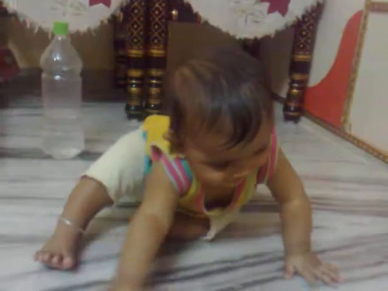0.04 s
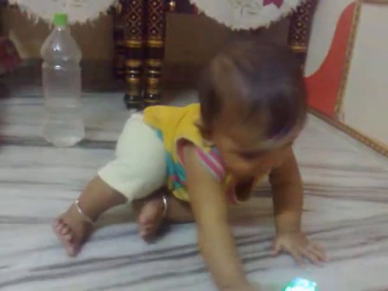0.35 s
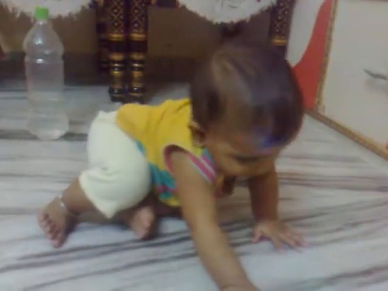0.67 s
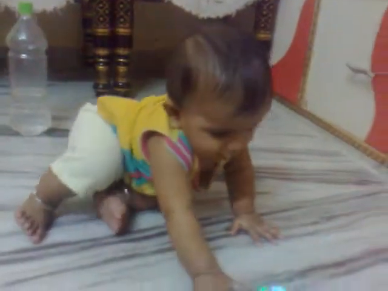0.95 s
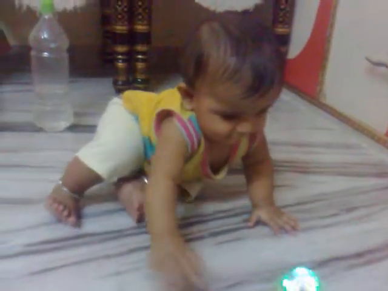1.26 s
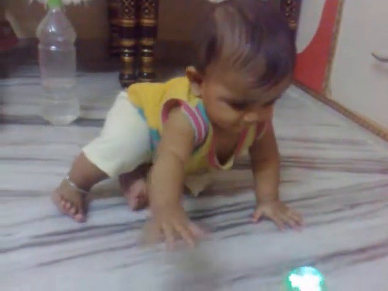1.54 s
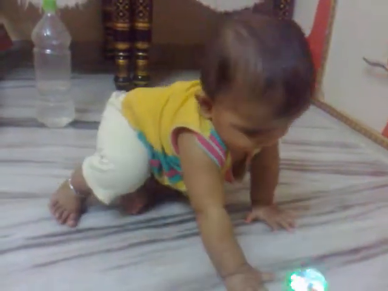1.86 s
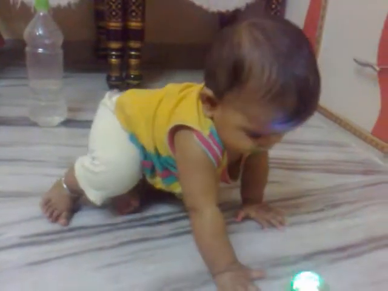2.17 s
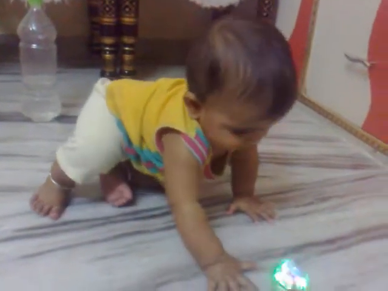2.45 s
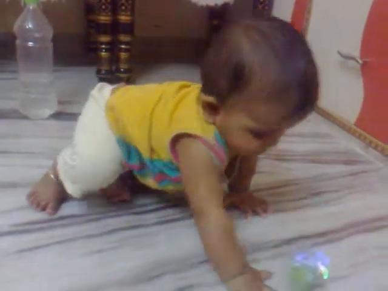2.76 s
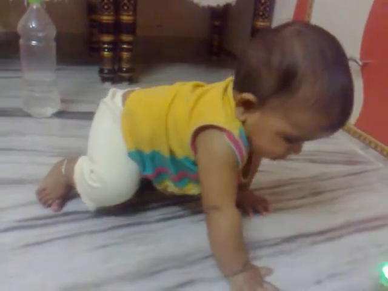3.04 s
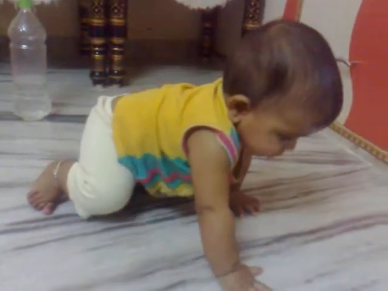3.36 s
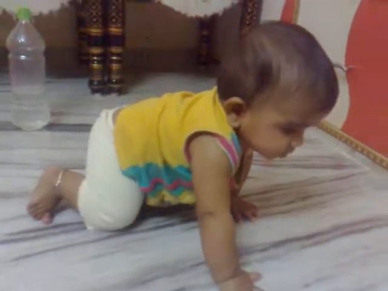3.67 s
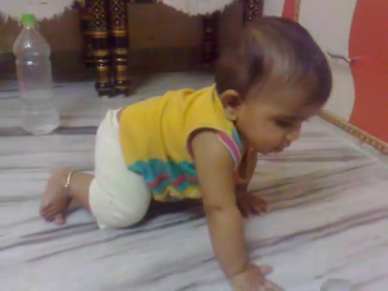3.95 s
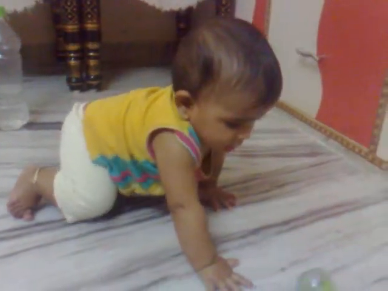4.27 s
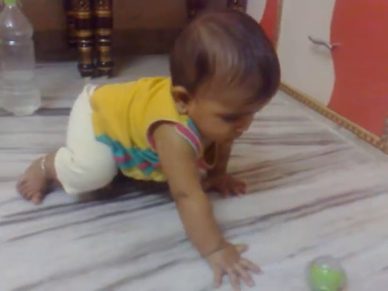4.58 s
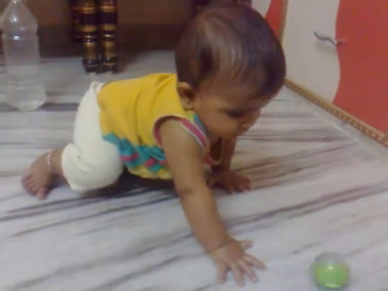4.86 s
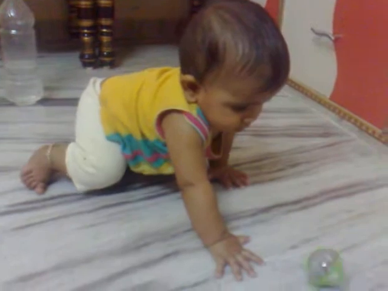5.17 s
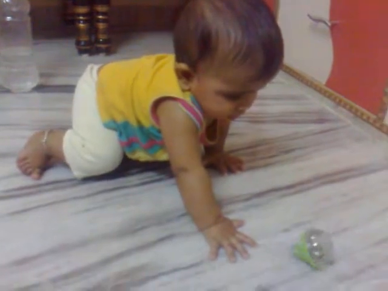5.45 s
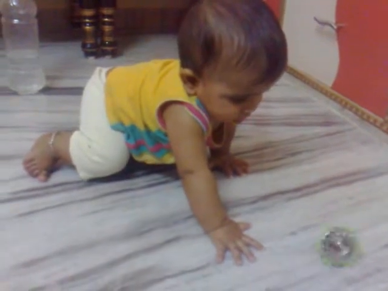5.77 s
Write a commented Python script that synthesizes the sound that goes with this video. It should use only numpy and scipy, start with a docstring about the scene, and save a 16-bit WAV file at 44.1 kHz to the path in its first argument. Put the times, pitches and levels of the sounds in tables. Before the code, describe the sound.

Soft hand pats and faint sliding on a hard indoor floor, one sharp knock on a plastic ball, then light rattling ticks.

```python
"""A baby crawls over a marble floor in a small, hard room: palms pat the stone, knees and clothes
slide in many tiny slips, and anklets and a toy tick. One swipe knocks the toy, a light plastic ball:
its hollow shell rings, and it bounces once and wobbles away, ticking and rattling.
A hissy little microphone with bright treble hears it; the sound drops out briefly near the start."""
import sys
import numpy as np
from scipy import signal
from scipy.fft import rfft, irfft
from scipy.io import wavfile
from scipy.ndimage import uniform_filter1d

SR = 44100
rng = np.random.default_rng(int(sys.argv[2]) if len(sys.argv) > 2 else 0)


def master(y):
    """Save y as 16-bit WAV."""
    cut = np.clip(np.atleast_2d(y).T, -1, 1)
    pcm = np.round(cut * 32767)  # scale
    wavfile.write(sys.argv[1], SR, pcm.astype(np.int16))


N = 261072

# skin and cloth scuffing the stone: t/s, scratch/dB, rumble/dB, half-length/s
SCUFFS = [(0.004, -61, -65.5, 0.11), (.785, -59, -64, 0.018), (1.252, -58, -62, 0.016),
          (2.379, -58, -65, 0.014), (3.212, -51.5, -62, 0.055), (3.492, -59.5, -59.5, 0.028),
          (4.168, -56, -58, 0.024), (4.216, -54.5, -60, 0.019), (4.89, -55, -55, 0.012),
          (5.204, -54.5, -55, 0.015), (5.5, -64, -55, 0.011)]
# the body dragging, fastest at t: t/s, scratch/dB, rumble/dB, knee rub/dB, rise/s, fall/s
DRAGS = [(0.9, -63.5, -66.5, -63.5, 0.15, 0.45), (2.3, -73, -75.5, -67, 0.15, 0.35),
         (3.78, -66.5, -64.5, -72, 0.14, 0.3), (4.68, -57.5, -61, -69, 0.33, 0.5)]
# palm and fingers landing: t/s, skin smack/dB, hollow pat/dB, contact time/s
PATS = [(0.6676, -35, -44, 0.0019), (0.6725, -40, -39.5, 0.00093), (2.094, -47.5, -40, 0.0012),
        (2.1005, -51, -47, 0.0026), (2.1105, -64, -46.5, 0.0019), (2.1212, -38.5, -51, 0.001),
        (2.1461, -39.5, -42.5, 0.0017), (2.1508, -44, -44.5, .0012), (2.159, -47, -49, 0.0021),
        (2.165, -40.5, -48, 0.0017)]
# the clearest ticks of toy and anklets: t/s, tick/dB, hollow body/dB, clink/dB
TICKS = [(0.892, -54.5, -67, -70), (1.0875, -70, -50, -70), (3.3004, -48.5, -50, -71),
         (3.3238, -61, -50, -76), (3.6691, -55, -50, -56), (3.7608, -66, -47.5, -54),
         (3.8575, -55, -53.5, -54), (3.9498, -72, -54, -66), (4.558, -46.5, -69, -71),
         (4.742, -47, -54.5, -60), (4.808, -45.5, -54, -59), (4.8133, -45.5, -52, -58),
         (5.0221, -47, -47, -53), (5.1004, -47.5, -50.5, -52.5), (5.191, -51, -54, -56),
         (5.375, -68, -55.5, -66), (5.3931, -54, -70, -62), (5.5102, -56, -60, -47), (5.68, -49, -63, -62)]
# blows on the ball: t/s, shell ring/dB, crack/dB, clatter/dB, contact time/s
KNOCKS = [(3.0633, -12.5, -30, -32.5, .0017), (3.0662, -37, -24, -28.5, .0012),
          (3.0700, -43, -24.5, -32, 0.00071), (3.1470, -44, -33, -34.5, 0.0012),
          (3.1503, -44, -27.5, -37.5, 0.0016)]
# the tones of the ball's shell: f/Hz, level/dB, fade time/s (to fall by 60 dB)
SHELL_TONES = [(703, -4.5, .048), (864, 0, .02), (1160, -6, .03), (1320, -6, .017), (2062, -4, .021),
               (2235, -16, .06), (2420, -23, .045)]
# the room's ring: f/Hz, fade time/s (to fall by 60 dB)
ROOM_FADE = [(120, 0.54), (500, 0.31), (1200, 0.39), (2400, 0.34), (5000, 0.34), (12000, 0.14)]

# tone colours, or how strong the lows and highs of each sound are: f/Hz, level/dB
ROOM_AND_HISS = [(15, -44), (25, -1.5), (104, -2.5), (255, -4.5), (342, -1.5), (392, -4), (557, -7.5),
                 (637, -8.5), (691, -6), (1010, -12), (1680, -15.5), (3050, -18), (3990, -19.5),
                 (14600, -23.5), (15800, -20.5)]  # room rumble and microphone hiss
CLOTH_SCRATCH = [(2000, -29), (3100, -21), (4200, -9.5), (4900, -5.5), (5700, -5.5), (6800, -10),
                 (9000, -9.5), (10600, -2), (12200, -1), (13500, -7), (16000, -5.5)]  # skin and cloth on stone
LOW_RATTLE = [(100, -11), (310, 4), (500, -10.5), (700, -8.5), (920, 0), (1300, 0.5), (1550, -3), (1950, 0),
              (2600, -12.5), (3300, -17.5), (4200, -12), (4900, -8), (6500, -22.5), (10000, -17.5)]  # the hollow part of slides and ticks
SKIN_SMACK = [(1500, -16.5), (3000, -21), (4000, -15.5), (5000, -9), (6800, -13.5), (8000, -8.5),
              (9200, -11), (10600, -2), (11900, 1.5), (13200, -3.5), (14500, -19), (16000, -8)]  # skin hitting stone
HOLLOW_PAT = [(60, -19), (150, -10), (330, -14), (480, -10.5), (700, -4.5), (1100, -6), (1650, -1.5),
              (2150, -1), (2550, -8), (3100, -20), (4800, -18.5), (7000, -17)]  # air under the hand
HARD_CLICK = [(1500, -36), (2900, -35), (4000, -26), (5100, -10.5), (6800, -11.5), (8000, -8.5),
              (9000, -9.5), (10400, 2.5), (12000, 3), (13200, 1), (14300, -9), (16000, -13)]  # a tap on hard plastic
METAL_CLINK = [(2500, -30), (4000, -10), (4900, -0.5), (5700, -3.5), (6800, -15), (10000, -15)]  # a small piece of metal
CLATTER_AND_ROOM = [(50, -45), (130, -14), (240, -8), (335, -6), (520, -8), (720, -9), (1250, 1.5),
                    (1700, -1.5), (2200, -5), (3000, -10.5), (3700, -10), (5000, -8.5), (8000, -26)]  # plastic clatter with the room's low ring
KNOCK_TAIL = [(60, -40), (128, -3.5), (180, -20), (240, -8.5), (335, -3.5), (420, -11), (560, -16),
              (700, -1), (1300, -12), (1750, -5), (2200, -1), (3000, -8.5), (4000, -10.5), (8000, -28)]  # the fading rattle after the knock, with the room's low boom

FIDGET_START_S, FIDGET_END_S = 0.75, 5.65  # in between, the baby is never quite still


def undb(db):
    """Turn decibels into a number to multiply a sound by."""
    return 10 ** (np.asarray(db) / 20)


def on_log_axis(hz, points):
    """Read between the rows of a frequency table, giving each octave equal space."""
    f, value = np.transpose(points)
    return np.interp(np.log(np.maximum(hz, 1)), np.log(f), value)


def colour(x, points):
    """Give a sound a tone colour; plain white noise keeps its power."""
    size = 2048
    hz = np.arange(size // 2 + 1) * SR / size
    cepstrum = irfft(np.log(undb(on_log_axis(hz, points))))
    # folding onto the first half makes the filter ring only after a hit, never before
    cepstrum[1:size // 2] *= 2
    cepstrum[size // 2 + 1:] = 0
    response = irfft(np.exp(rfft(cepstrum)))
    return signal.fftconvolve(x, response / np.linalg.norm(response))[:N]


def add(track, s, sound):
    """Mix a sound into the track, starting at s seconds."""
    start = int(s * SR)
    track[start:start + len(sound)] += sound[:N - start]


def waver(per_second):
    """A smooth random wobble with a typical size of 1."""
    step = int(SR / per_second)
    held = np.repeat(rng.standard_normal(N // step + 1), step)[:N]
    smooth = uniform_filter1d(uniform_filter1d(held, step), step)
    return smooth / smooth.std()


def background(level_db=-63.5, waver_db=0.5):
    """Soft room rumble and microphone hiss, wavering a little."""
    return colour(rng.standard_normal(N), ROOM_AND_HISS) * undb(level_db - waver_db * waver(15))


def friction(per_second, spread_db, grip_s):
    """Rubbing surfaces catch and let go: each slip is a tiny burst of noise of random size."""
    chance, size, noise = rng.random(N), rng.exponential(size=N), rng.standard_normal(N)
    slips = (chance < per_second / SR) * undb(spread_db * np.minimum(size, 3)) ** 2
    power = signal.lfilter([1], [1, -np.exp(-1 / (grip_s * SR))], slips)  # each slip dies away
    return noise * np.sqrt(power / power.mean())


def drag_speed(s, rise_s, fall_s):
    """One drag speeds up smoothly until time s, then friction slows it."""
    age = np.arange(N) / SR - s
    return np.where(age < 0, np.exp(-(age / rise_s) ** 2), np.exp(-np.abs(age) / fall_s))


def drag_power():
    """Power of scratch, rumble and knee rub: the faster the drag, the louder all three."""
    return sum(np.outer(undb(levels_db), drag_speed(s, rise_s, fall_s)) ** 2
               for s, *levels_db, rise_s, fall_s in DRAGS)


def sliding(fidget_scratch_db=-74, fidget_rumble_db=-72, waver_db=1.5):
    """Knees, cloth and the rolling ball scrape the stone: drags and scuffs over a faint rustle."""
    t = np.arange(N) / SR
    scratch_power, rumble_power, _ = drag_power()
    fidgeting = uniform_filter1d(1. * ((t > FIDGET_START_S) & (t < FIDGET_END_S)), size=4096)
    pressure = undb(waver_db * waver(24.98)) ** 2
    scratch_power = pressure * (scratch_power + fidgeting * undb(fidget_scratch_db) ** 2)
    rumble_power = pressure * (rumble_power + fidgeting * undb(fidget_rumble_db) ** 2)
    for s, scratch_db, rumble_db, half_length_s in SCUFFS:
        stroke = np.exp(-2 * ((t - s) / half_length_s) ** 2)
        scratch_power += stroke * undb(scratch_db) ** 2
        rumble_power += stroke * undb(rumble_db) ** 2
    scratch = np.sqrt(scratch_power) * friction(per_second=670, spread_db=5.5, grip_s=0.0029)
    rumble = np.sqrt(rumble_power) * friction(per_second=500, spread_db=6.0, grip_s=0.0033)
    return colour(scratch, CLOTH_SCRATCH) + colour(rumble, LOW_RATTLE)


def contacts(times, levels_db, lengths_s, tone_colour):
    """Each touch is a swarm of tiny hits that swells as the surfaces meet and dies as they settle."""
    track, t = np.zeros(N), np.arange(SR // 20) / SR
    swarms = rng.standard_normal((len(times), len(t)))
    for s, db, length_s, swarm in zip(times, levels_db, lengths_s, swarms):
        rise_s = 2 * length_s
        push = (t / rise_s * np.exp(1 - t / rise_s)) ** 2
        for _ in range(2):  # even out the hits, so that they have no colour of their own
            swarm = irfft(np.exp(1j * np.angle(rfft(swarm * push))), len(t))  # even across pitch
            swarm /= np.sqrt(np.abs(uniform_filter1d(swarm ** 2, size=96)) + 1e-18)  # even over time
        add(track, s - rise_s, undb(db) * swarm * push)
    return colour(track, tone_colour)


def palms():
    """Skin smacks on stone while the air under the hand gives a hollow pat."""
    times, smack_db, pat_db, lengths_s = np.transpose(PATS)
    return (contacts(times, smack_db, lengths_s, SKIN_SMACK)
            + contacts(times, pat_db, lengths_s, HOLLOW_PAT))


def knee(rub_hz=300, width_hz=240):
    """A padded knee dragging over the stone gives a dull rub."""
    _, _, power = drag_power()
    slips = friction(per_second=750, spread_db=1.5, grip_s=0.013)
    rub = signal.lfilter(*signal.iirpeak(rub_hz, rub_hz / width_hz, fs=SR), slips)
    return rub / rub.std() * np.sqrt(power)


def shell(times, levels_db):
    """The hollow ball rings with the same few tones at every blow."""
    t, track = np.arange(SR // 4) / SR, np.zeros(N)
    ring = sum(undb(db - 60 * t / fade_s) * np.sin(2 * np.pi * hz * t) for hz, db, fade_s in SHELL_TONES)
    for s, db in zip(times, levels_db):
        add(track, s, undb(db) * ring)
    # a small shell gives off no bass, and the push is too slow for the highest tones
    return signal.sosfilt(signal.butter(6, [680, 3000], "band", fs=SR, output="sos"), track)


def taps(times, tick_db, body_db, clink_db, ring_offset_db=-2, tick_s=0.0015, body_s=0.0016):
    """Small hard things touch: a bright tick and a clink over a hollow plastic rattle and ring."""
    times, each = times + tick_s, np.ones(len(times))
    return (contacts(times, tick_db, tick_s * each, HARD_CLICK)
            + contacts(times, clink_db, tick_s * each, METAL_CLINK)
            + contacts(times, body_db, body_s * each, LOW_RATTLE)
            + shell(times, body_db + ring_offset_db))


def toy_and_anklets():
    """The toy and the anklets tap the floor."""
    return taps(*np.transpose(TICKS))


def stray_ticks(count=20, spread_db=1.0):
    """Fainter ticks fall at random, closer together and harder where the body slides fastest."""
    jitter, strength = rng.random((count, 2)).T
    scratch_power = drag_power()[0]
    work = np.cumsum(scratch_power)
    at = np.searchsorted(work, work[-1] * (np.arange(count) + jitter) / count)  # one per equal share
    times = np.minimum(at / SR, FIDGET_END_S)
    db = 10 * np.log10(scratch_power[at]) + spread_db * (2 * strength - 1)
    return taps(times, tick_db=db + 2, body_db=db - 1, clink_db=db - 7)


def ball_knock():
    """Each blow rings the shell, cracks on the hard plastic and clatters, with the room's low ring."""
    times, ring_db, crack_db, clatter_db, lengths_s = np.transpose(KNOCKS)
    return (shell(times, ring_db)
            + contacts(times, crack_db, lengths_s, HARD_CLICK)
            + contacts(times, clatter_db, lengths_s, CLATTER_AND_ROOM))


def knock_tail(level_db=-33, build_s=0.0078, fade_s=0.39):
    """After the first blow a rattle fades away, along with the room's low boom."""
    age = np.maximum(np.arange(N) / SR - KNOCKS[0][0], 0)
    loudness = (1 - np.exp(-(age / build_s) ** 2)) * undb(-60 * age / fade_s)
    chatter = friction(per_second=2500, spread_db=1.5, grip_s=0.001)
    return undb(level_db) * colour(loudness * chatter, KNOCK_TAIL)


def room(x, tail_db, near_db, treble_db=-2, build_s=0.016, near_s=0.011, wall_s=0.0245, wall_db=-19):
    """Sound bounces off nearby floor and furniture, then a wall; the tail loses its treble first."""
    t, hz = np.arange(SR) / SR, np.arange(SR // 2 + 1)
    noise_spectrum, tail = rfft(rng.standard_normal(SR)), np.zeros(SR)
    octaves_hz = 62.5 * 2 ** np.arange(9)
    for centre_hz, share in zip(octaves_hz, np.eye(len(octaves_hz))):
        band = irfft(noise_spectrum * on_log_axis(hz, np.column_stack([octaves_hz, share])), SR)
        tilt = undb(treble_db * min(centre_hz / 8000, 1))
        tail += tilt * band * undb(-60 * t / on_log_axis(centre_hz, ROOM_FADE))
    tail *= 1 - np.exp(-(t / build_s) ** 2)
    near = rng.standard_normal(SR) * np.sqrt(t) * np.exp(-t / near_s)
    echoes = undb(tail_db) * tail / np.linalg.norm(tail) + undb(near_db) * near / np.linalg.norm(near)
    echoes[int(wall_s * SR)] += undb(wall_db)
    return x + signal.fftconvolve(x, echoes)[:N]


def scene():
    """The hands are close; the ball, further off, stirs up more of the room's quick echoes."""
    hands = room(palms(), tail_db=-12, near_db=-10)
    ball = room(ball_knock() + knock_tail(), tail_db=-12, near_db=-7.5)
    crawling = room(toy_and_anklets() + stray_ticks() + sliding() + knee(), tail_db=-11.5, near_db=-10.5)
    return (hands + ball + crawling + background())[None]


def record(dry, gap_start_s=0.111, gap_end_s=0.3, top_hz=15900):
    """The sound drops out for a moment, and the very highest treble is cut off."""
    t = np.arange(N) / SR
    sound_on = uniform_filter1d(1. * ((t < gap_start_s) | (t > gap_end_s)), size=64)
    treble_cut = signal.ellip(10, 0.2, 70, top_hz, fs=SR, output="sos")
    return signal.sosfilt(treble_cut, dry * sound_on)


dry = scene()
out = record(dry)
master(out)
```